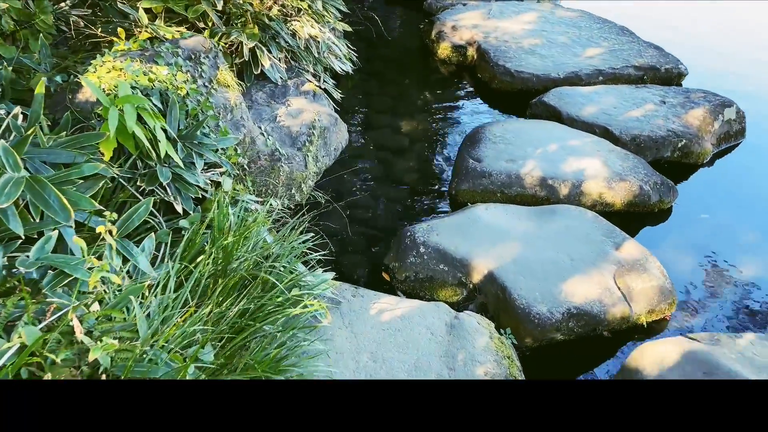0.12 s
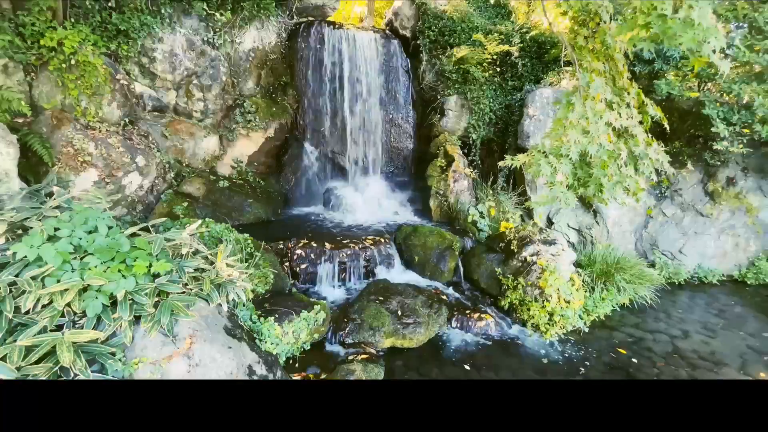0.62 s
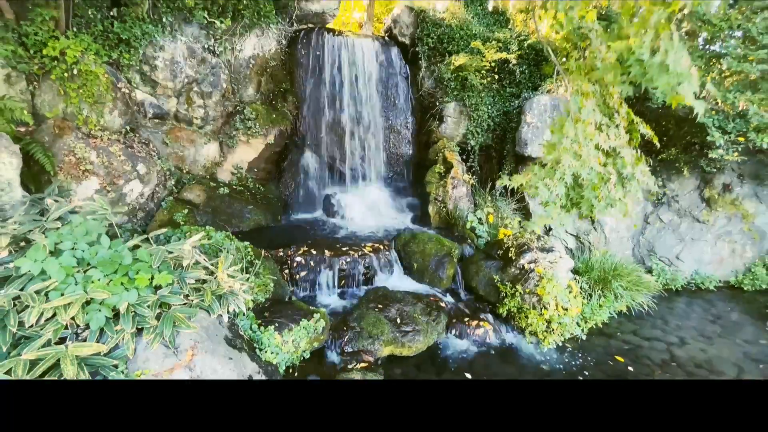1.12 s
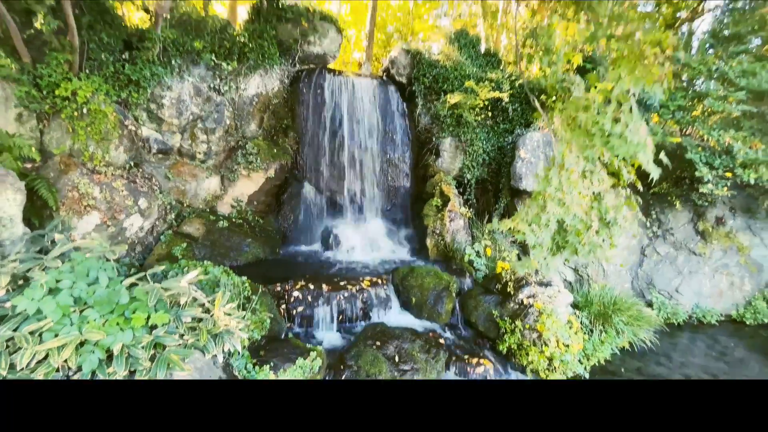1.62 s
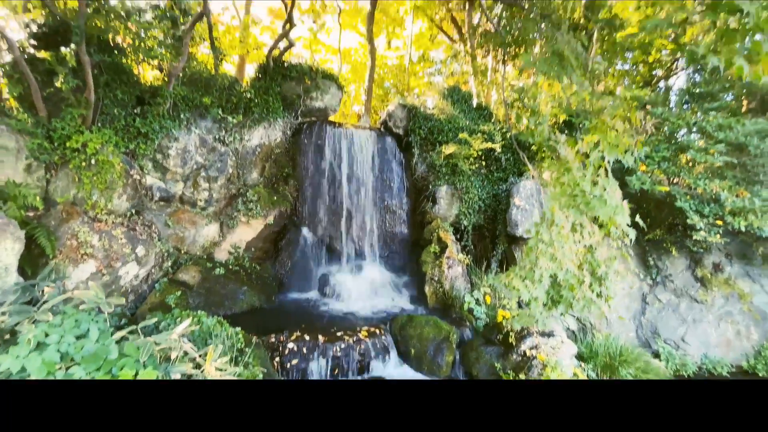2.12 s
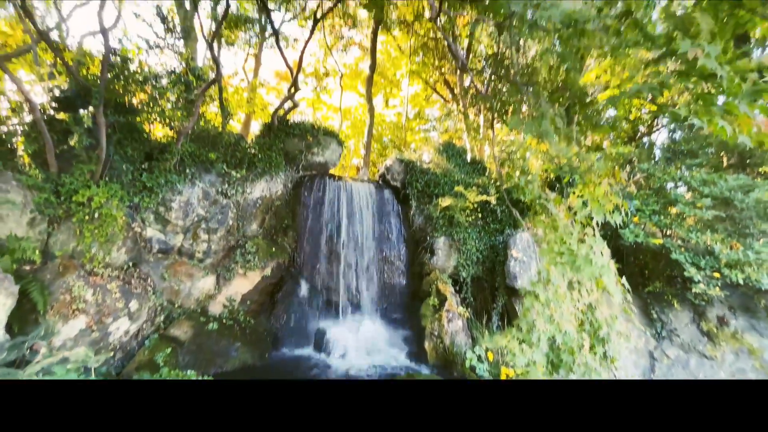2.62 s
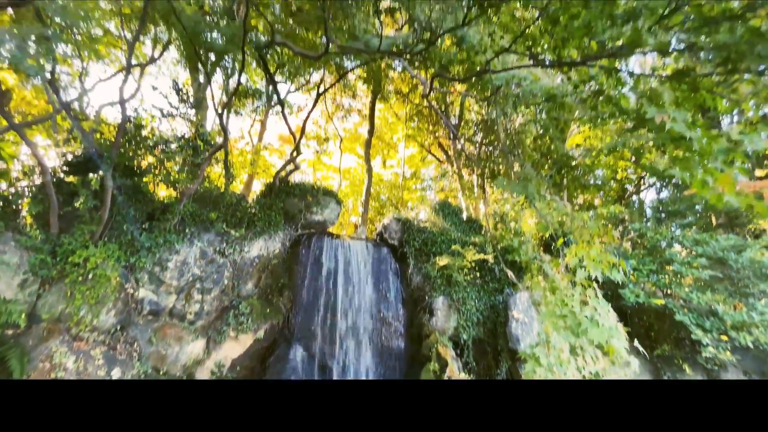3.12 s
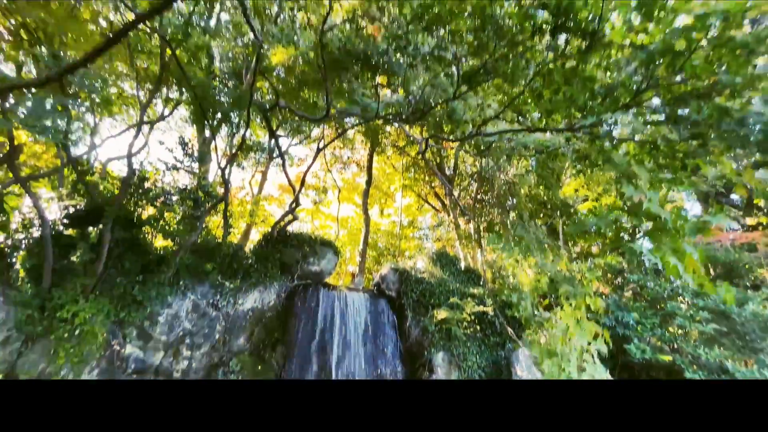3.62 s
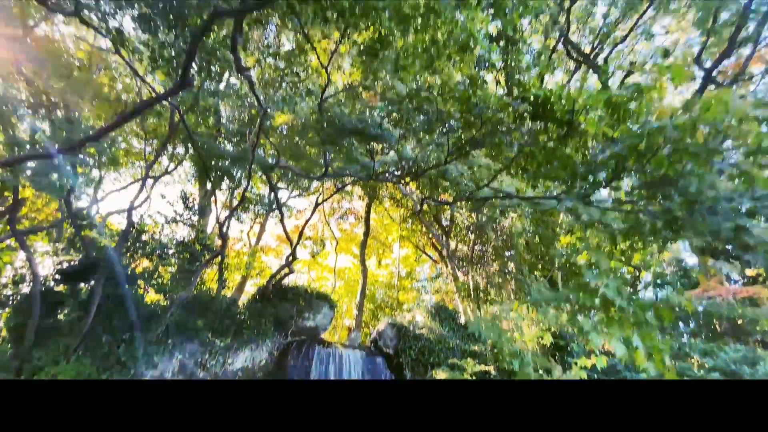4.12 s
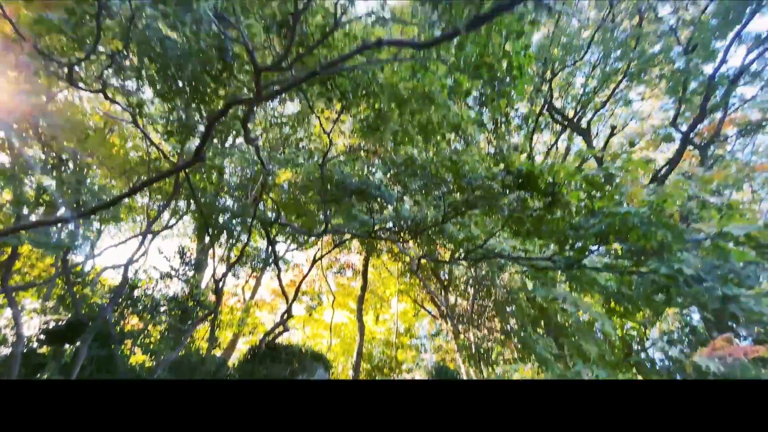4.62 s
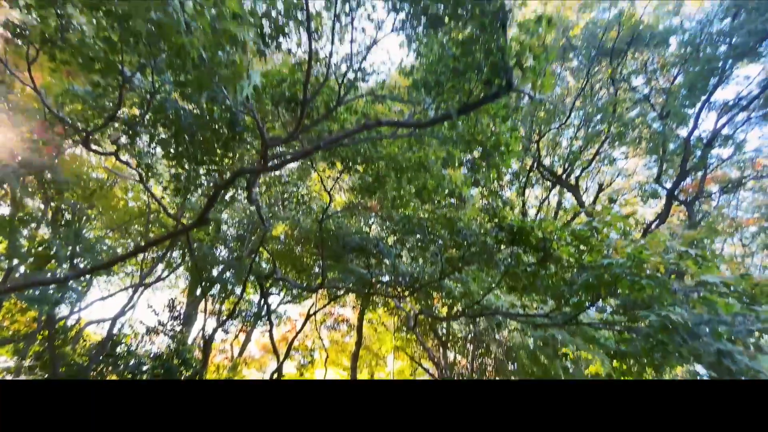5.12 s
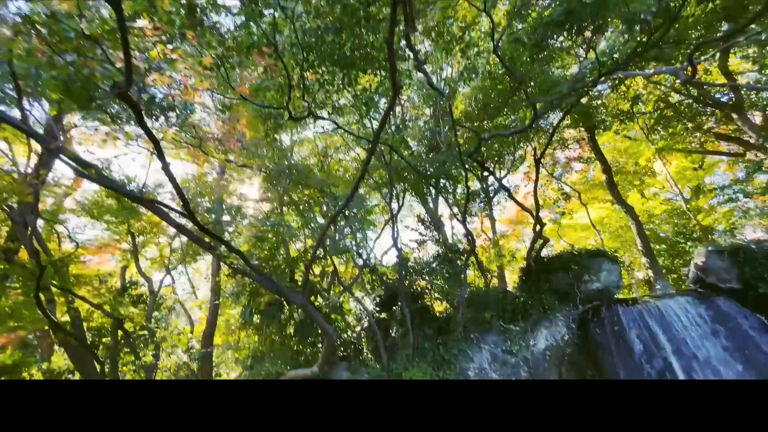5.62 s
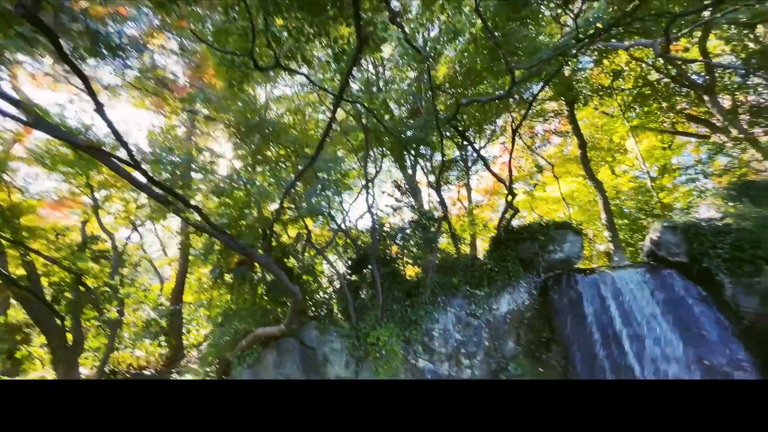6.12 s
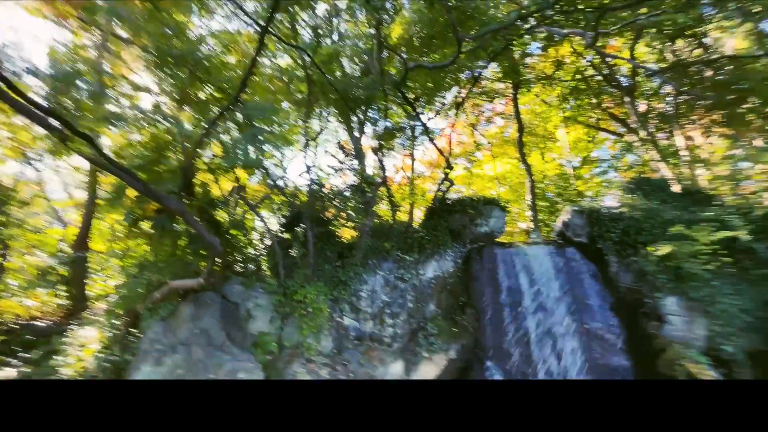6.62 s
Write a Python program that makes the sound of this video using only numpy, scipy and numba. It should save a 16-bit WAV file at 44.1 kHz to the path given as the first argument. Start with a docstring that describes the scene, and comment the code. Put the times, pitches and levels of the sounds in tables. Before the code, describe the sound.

A phone in a leafy rock garden hears a small fall pouring into a pool. Silence comes first, then water at full flow almost instantly, with uneven bubbling, crisp spray and occasional bright drop ticks toward the left. It softens gently until a quick change of spot brings a closer, brighter rush that grows a little louder and stays running until the end, without any fade.

```python
"""Small garden waterfall from two spots

A fall drops over rocks into a pool, heard by a phone from two spots, the second closer.
Banded noise makes the roar; decaying sines are bubbles and single drops, which rise in pitch, and spray,
which holds its pitch. Rocks and leaves scatter part of the sound, unrelated left and right. The two
microphone ports hear the fall with a lag, so bands of treble swing in and out of phase."""
import sys
import numpy as np
from scipy import signal
from scipy.fft import rfft, irfft
from scipy.io import wavfile
from scipy.ndimage import uniform_filter1d
from numba import njit

SR = 44100
rng = np.random.default_rng(int(sys.argv[2]) if len(sys.argv) > 2 else 0)


def gain_from_db(level_db):
    """Convert decibel levels to linear amplitude factors (20 dB per decade)."""
    decades = np.asarray(level_db, float) / 20
    return 10 ** decades


def output_pcm(signal):
    """Save a mono or channel-first signal as 16-bit PCM at the path in sys.argv[1].

    Samples are clipped to [-1, 1] before scaling.
    """
    pcm = np.clip(np.atleast_2d(signal).T, -1, 1) * 32767
    wavfile.write(sys.argv[1], SR, np.round(pcm).astype(np.int16))


N = 298116  # samples


@njit
def grains(at, hz, cycles, size, glide):
    """Ringing air or struck drops: decaying sines whose pitch rises by the fraction glide, if any."""
    out = np.zeros(N + 20000)
    for k in range(len(at)):
        length = min(int(5 * cycles[k] * SR / hz[k] / 3), 20000)
        step = np.exp(2j * np.pi * hz[k] / SR - 3 * hz[k] / cycles[k] / SR)
        bend = np.exp(2j * np.pi * hz[k] / SR * glide / length)
        phasor = size[k] + 0j
        for i in range(length):
            out[at[k] + i] += phasor.imag
            phasor *= step
            step *= bend
    return out[:N]


def unit(x):
    """Scale to rms 1."""
    return x / np.sqrt(np.mean(x ** 2))


def walk(rate):
    """Random levels held for 1 / rate seconds and smoothed twice."""
    hold = int(SR / rate)
    steps = np.repeat(rng.standard_normal(N // hold + 1), hold)
    return uniform_filter1d(uniform_filter1d(steps, hold), hold)[:N]


def shower(count, low_hz, high_hz, cycles, spread_db, glide):
    """Random grains, sized so that the sum is flat per Hz; with a spread, a few are louder than most."""
    when, pitch, luck = rng.random((count, 3)).T
    hz = low_hz * (high_hz / low_hz) ** pitch
    extra_db = np.minimum(-spread_db * np.log(1 - luck), 4 * spread_db)
    size = hz * gain_from_db(extra_db)
    return unit(grains((when * N).astype(np.int64), hz, np.full(count, cycles), size, glide))


def rumble_waver():
    """The low rumble wavers at random in dB, with a few stronger swells on top."""
    # Each row: time of the peak in seconds, swell in dB over the wavering rumble.
    swells = [(.59, 2.5), (2.26, 4), (2.6, 5), (4.24, 2), (5.21, 4.5), (6.1, 3), (6.33, 3), (6.66, 3)]
    half_s = 0.07  # from the peak to 1 / e of the swell's dB
    t = np.arange(N) / SR
    waver_db = 0.8 * unit(walk(16))
    return waver_db + sum(db * np.exp(-((t - s) / half_s) ** 2) for s, db in swells)


def splats():
    """Single loud drops on stone: short bright ticks that reach the left port first."""
    # Each row: start in seconds, starting size in dB ahead of the port balance, pitch in Hz.
    drops = [(0.7155, -10, 3600), (1.109, -16.5, 3000), (1.306, -19, 2800), (1.454, -12.5, 2700),
             (2.725, -11, 5670), (3.57, -13, 3000), (3.721, -12, 5500)]
    port_lag = 3  # samples
    s, db, hz = np.transpose(drops)
    ticks = grains((s * SR).astype(np.int64), hz, np.full(len(s), 4.0), -gain_from_db(db), 0.17)
    balance_db = np.array([[2.5], [-3.0]])  # left, right
    return np.array([ticks, np.roll(ticks, port_lag)]) * gain_from_db(balance_db)


def roar(surge, flicker_db):
    """Octave bands of dense impact noise that surge with the flow and flicker alone."""
    spectrum = rfft(rng.standard_normal(N))
    octave = np.log2(np.fft.rfftfreq(N, 1 / SR) + 1)
    out = 0
    for centre in np.arange(4, 15):
        band = irfft(spectrum * np.clip(1 - abs(octave - centre), 0, 1), N)
        out = out + band * gain_from_db(surge + flicker_db * walk(25))
    return unit(out)


def trapped_air():
    """Trapped air rings under water with a rising pitch: deep gulps, bubbles and fine fizz."""
    gulps = gain_from_db(-24) * shower(count=300, low_hz=43.7, high_hz=306.5, cycles=11.0, spread_db=2.0, glide=0.17)
    bubbles = gain_from_db(-10.5) * shower(count=5000, low_hz=298.5, high_hz=3462, cycles=11.6, spread_db=1.5, glide=0.34)
    fizz = gain_from_db(-7.5) * shower(count=14000, low_hz=1406, high_hz=12100, cycles=4.1, spread_db=0.0, glide=0.075)
    return gulps, bubbles, fizz


def stone_spray():
    """Spray ticks on stone: very short grains at a steady pitch."""
    return gain_from_db(-9.5) * shower(count=5000, low_hz=2520, high_hz=13800, cycles=1.73, spread_db=3.0, glide=0.)


def water():
    """Direct sound of the fall, and what the rocks and leaves scatter back, both still uncoloured."""
    surge = 0.25 * walk(16)  # dB
    gulps, bubbles, fizz = trapped_air()
    spray = stone_spray()
    # the sheet breaks up in clumps, so grains come in clusters
    clumps = bubbles * gain_from_db(2.5 * walk(35))
    clumps = clumps + fizz * gain_from_db(3.5 * walk(45))
    clumps = clumps + spray * gain_from_db(3.5 * walk(30))
    direct = unit(roar(surge, 0.7) + gain_from_db(surge) * (gulps + clumps))
    scattered = np.array([roar(surge, 1.0), roar(surge, 3.1)])
    return direct, scattered


def ports(direct, scattered, table):
    """Colour, balance and lag of each port; scattered sound is unrelated left and right."""
    hz, *columns = np.transpose(table)
    f = np.fft.rfftfreq(N, 1 / SR)
    db, pan_db, lead, like = (np.interp(np.log(f + 1), np.log(hz), column) for column in columns)
    like = np.clip(like, 0, 1)
    side = np.array([[.5], [-.5]])  # left, right
    shared = np.sqrt(like) * np.exp(1j * side * lead) * rfft(direct)
    unrelated = np.sqrt(1 - like) * rfft(scattered)
    rumble_cut = np.minimum(f / hz[0], 1) ** 3
    return (shared + unrelated) * gain_from_db(db + side * pan_db) * rumble_cut, f


def spot(direct, scattered, table, tilt, ranges_db, follows, treble_db, waver_db):
    """The fall from one spot; tilting the phone moves five ranges by different amounts."""
    # Treble of both spots. Each row: frequency in Hz, relative density in dB, left minus right in dB,
    # left lead in radians, likeness of the ports from 0 to 1.
    treble = [(6950, -67.8, 0.1, -3.14, 0.97), (8100, -69.4, 0.1, -3.2, 0.97),
              (8500, -69.2, 0.1, -3.98, 0.78), (9500, -71.4, 0.2, -5.02, 0.69),
              (10100, -72.8, -0.2, -6.13, 0.89), (12100, -76.1, -0.1, -6.39, 0.9),
              (12700, -75.3, -0.1, -7.76, 0.6), (13600, -76.1, 0.1, -9.35, 0.94),
              (14600, -73.7, -0.0, -9.42, 0.97), (15500, -76.7, 0.0, -9.42, 0.97)]
    # The limits between rumble, body, splash, spray and hiss, in Hz.
    limits_hz = (250, 2000, 3600, 6600)
    raised = [(hz, db + treble_db, *rest) for hz, db, *rest in treble]
    spectrum, f = ports(direct, scattered, list(table) + raised)
    below = [0, *(1 / (1 + (f / hz) ** 8) for hz in limits_hz), 1]
    parts = [irfft(spectrum * (high - low), N) for low, high in zip(below, below[1:])]
    parts[0] = parts[0] * gain_from_db(waver_db)
    s, db = np.transpose(tilt)
    mean_db = np.mean(db)
    swing_db = np.interp(np.arange(N) / SR, s, db) - mean_db
    out = 0
    for part, range_db, share in zip(parts, ranges_db, follows):
        level = gain_from_db(mean_db + range_db + share * swing_db)
        out = out + level * part / np.std(part.mean(axis=0))
    return out


def scene():
    """First spot fades in from silence, then a quick cross-fade to the second, with drops throughout."""
    # Colour at each spot. Each row: frequency in Hz, density in dB relative to its own range,
    # left minus right in dB, left lead in radians, likeness of the ports from 0 to 1.
    far_colour = [(30, -84, 0.3, 0.11, 0.81), (55, -61.5, 0, 0.4, 0.9), (114, -66, 0, 0.35, 0.92),
                  (245, -61, 1.5, 0.2, 1), (310, -66, 0.5, 0.05, 0.83), (686, -61.5, 2, 0.35, 0.81),
                  (1350, -63.5, 2.5, 0.53, 0.81), (1860, -67, 0.5, -0.64, 0.71),
                  (2530, -64.5, 2, 0.6, 0.77), (3240, -65, 1.5, 0.99, 0.89), (3800, -67.5, 5.5, 1, 0.77),
                  (4350, -68.5, 5.5, -0.35, 0.83), (4840, -66.5, 1, 0.04, 0.86),
                  (5370, -67.5, 6.5, 0.061, 0.7), (6180, -68.5, 7.5, -1.56, 1)]
    near_colour = [(30, -87, 0.0, -0.06, 0.78), (55, -57.5, 2, -0.061, 0.99), (110, -62, 0, -0.023, 0.85),
                   (240, -58, 2.5, -0.52, 1), (320, -62.5, 0.5, -1, 0.79), (645, -59, -3.5, -1.26, 0.75),
                   (1240, -61, -3, -1.25, 0.78), (1870, -62.5, -0.7, -1.3, 0.85), (2630, -63, 6, 0.2, 0.45),
                   (3300, -62, 4.7, 0.34, 0.55), (3900, -61, 3.5, 0.36, 0.75), (4300, -62, 2.5, 0.09, 0.79),
                   (4860, -61, 2.5, -0.01, 0.98), (5640, -63, 7.5, -0.33, 0.74),
                   (6280, -62, 3, -1.86, 0.94)]
    # The phone tilts up, away from the fall, then from the second spot swings back to it.
    # One list a spot, each row: time in seconds, level in dB.
    tilts = [
        [(0.6, -28), (0.61, -27.5), (2.09, -27), (4.33, -29), (5.5, -29)],
        [(5.56, -28), (6.378, -26), (6.75, -25.5)],
    ]
    # Each row is a spot: rumble, body, splash, spray and hiss, in dB against its mean level.
    ranges = [(-13, -5, -7, -9, -9), (-13.5, -5, -8.5, -6.5, -8.5)]
    # Each row is a spot: dB that each of the five ranges moves per dB of level.
    follows = [(0.65, 0.85, 1.07, 0.89, 0.67), (0.41, 1.44, 2.1, 0.36, 0.75)]
    start_s, fade_s = 0.5265, 0.021
    move_s, cross_s = 5.525, 0.008  # middle and length of the cross-fade
    t = np.arange(N) / SR
    direct, scattered = water()
    waver_db = rumble_waver()
    far = spot(direct, scattered, far_colour, tilts[0], ranges[0], follows[0], 0, waver_db)
    near = spot(direct, scattered, near_colour, tilts[1], ranges[1], follows[1], 3, waver_db)
    move = np.clip((t - move_s) / cross_s + .5, 0, 1)
    fade_in = np.clip((t - start_s) / fade_s, 0, 1)
    return fade_in * ((1 - move) * far + move * near + splats())


def low_pass(x):
    """Removes everything above the highest recorded frequency."""
    return signal.sosfilt(signal.butter(12, 15820, fs=SR, output="sos"), x)


def record(dry):
    """The finished mix of both microphone ports, as the phone stores it."""
    return low_pass(dry)


dry = scene()
out = record(dry)
output_pcm(out)
```